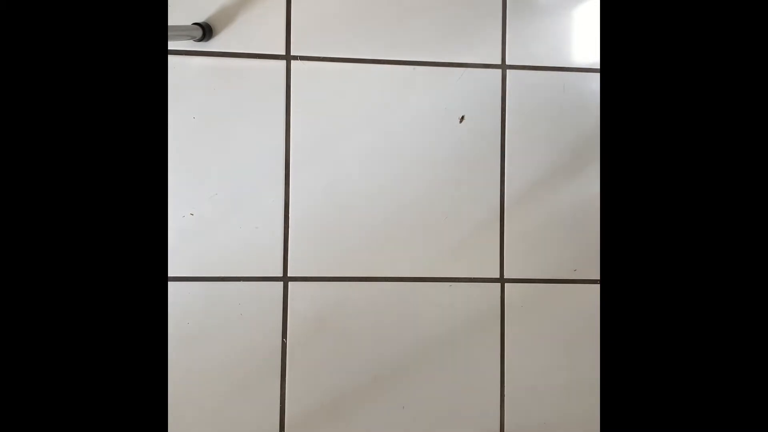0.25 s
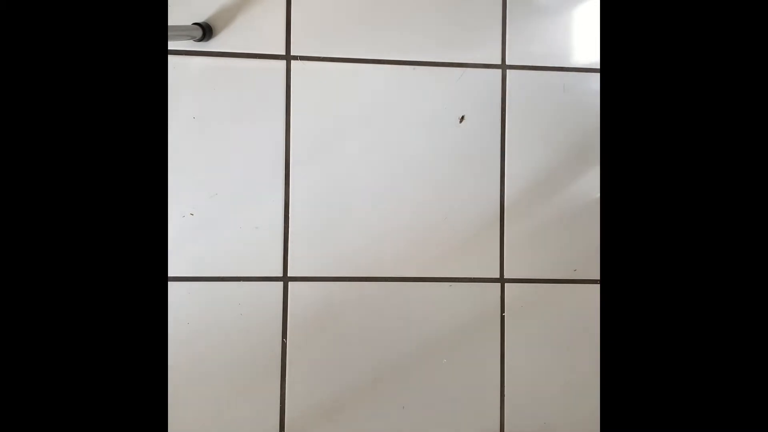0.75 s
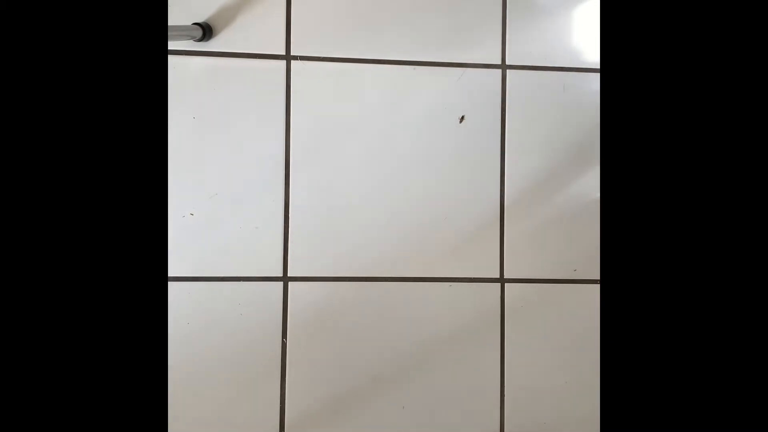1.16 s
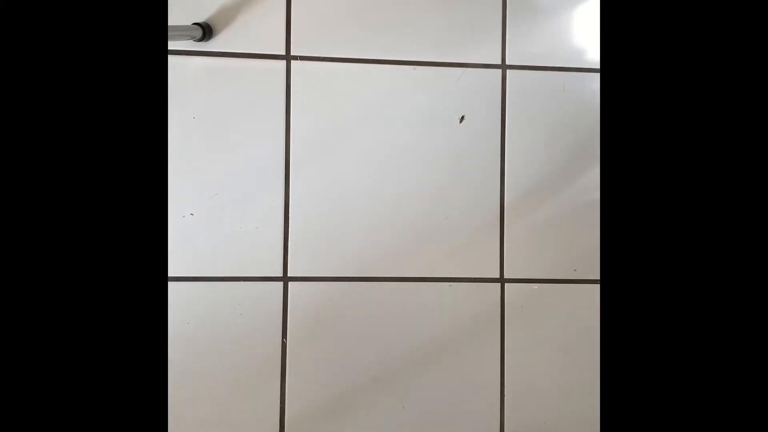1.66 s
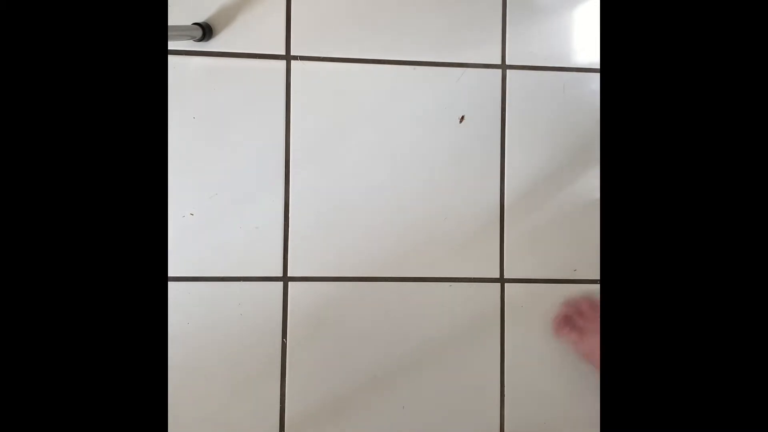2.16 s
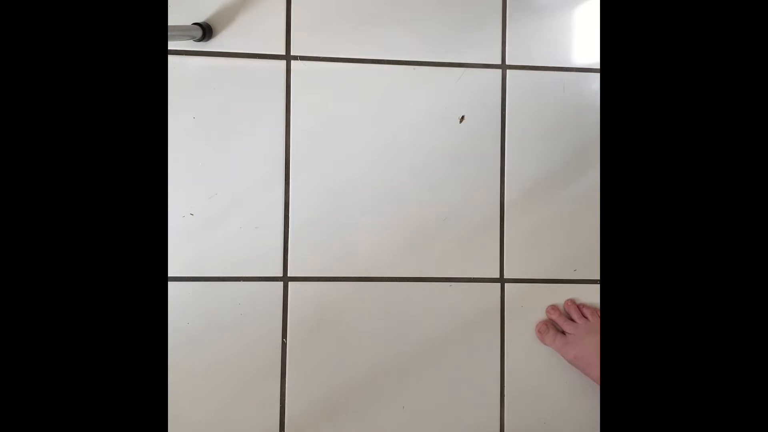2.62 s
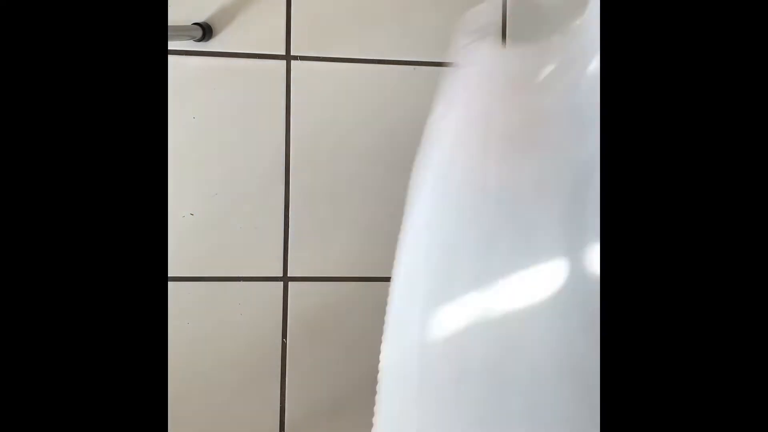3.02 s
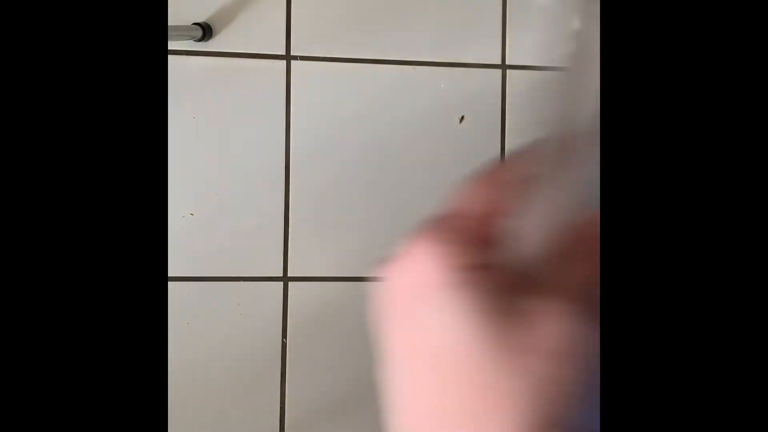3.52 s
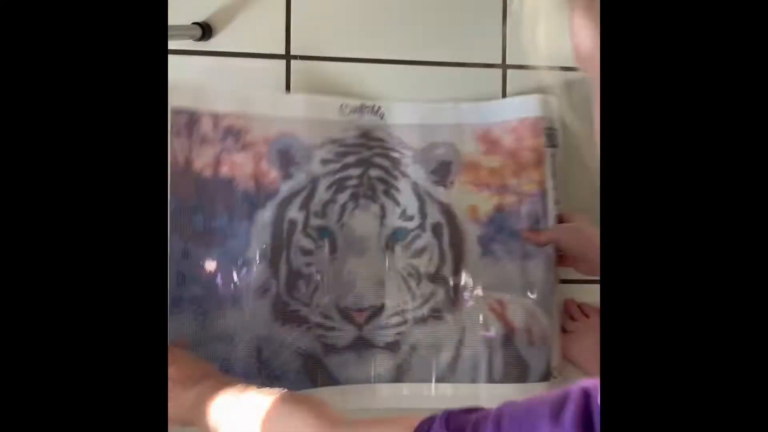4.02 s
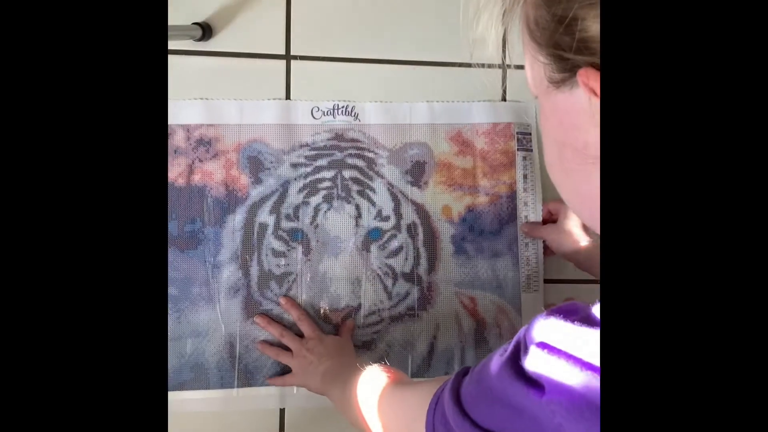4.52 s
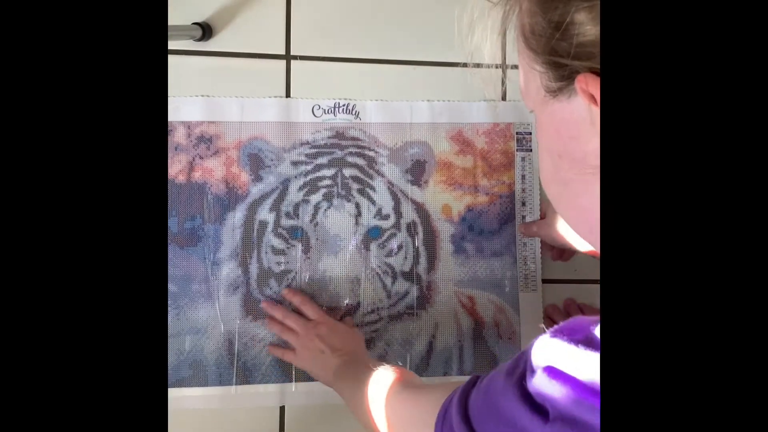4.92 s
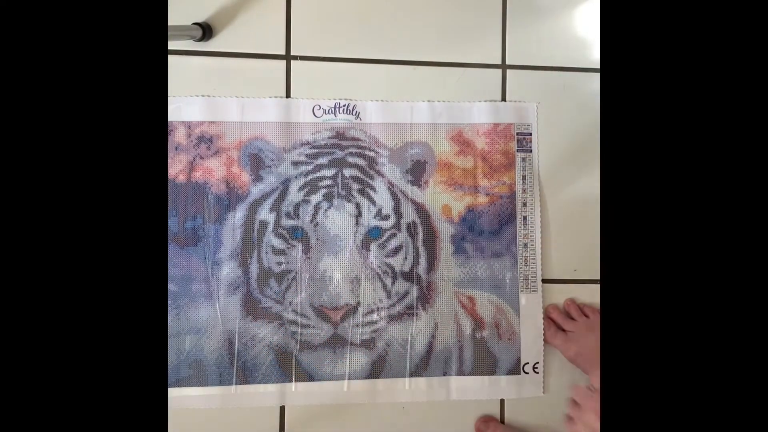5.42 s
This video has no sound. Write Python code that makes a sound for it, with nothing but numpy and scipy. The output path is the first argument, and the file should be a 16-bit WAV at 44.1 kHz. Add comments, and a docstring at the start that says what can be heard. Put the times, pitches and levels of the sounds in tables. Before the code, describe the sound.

In a small tiled room, a rolled canvas under plastic film is handled close to a stereo microphone. Crisp crinkles come in short bursts, with a hard snapping cluster near 1.5 seconds, hollow rubbing and soft footfalls. It crackles loudest just before 3 seconds, quietens, then slaps down with a sharp crack at about 4.1 seconds. A few small smoothing rustles follow and fade to near silence.

```python
"""A stiff canvas under plastic film is unrolled, carried barefoot over tiles, laid down and smoothed by hand.
From the start, noise rumbles, filtered deep noise stirs, a dense swarm of tiny buckles rings the film
and rubbing booms in the roll; creases crack and ring, with short echoes from tiles and walls.
Then soft hollow bumps swell and die, gliding resonances creak, and heels thud as sagging sines.
By 3 s the open sheet flaps dully in place of the roll; two close microphone ports hear it all."""
import sys
import numpy as np
from scipy import signal
from scipy.fft import rfft, irfft, next_fast_len
from scipy.io import wavfile

SR = 44100
rng = np.random.default_rng(int(sys.argv[2]) if len(sys.argv) > 2 else 0)


def generate_wav(sig):
    """Save sig (samples, or channels by samples) to the path in sys.argv[1] as 16-bit PCM at SR."""
    pcm = np.round(np.clip(np.atleast_2d(sig).T, -1, 1) * 32767).astype(np.int16)
    wavfile.write(sys.argv[1], SR, pcm)


N = 250045

# spectrum of room noise and hiss: f/Hz, relative level per Hz/dB
RUMBLE_SPECTRUM = [(15, -45.5), (25, -11.5), (43, 0.5), (92, -3), (120, -13.5), (157, -19.5), (190, -20),
                   (217, -11.5), (818, -33), (988, -20.5), (1740, -41.5), (13200, -34.5), (16000, -44)]
RUMBLE_DB = -69.5   # rms, before the bass wanders

# deep stir of feet and cloth in floor and air: t/s, mean level/dB
STIR_LEVELS = [(0.0, -56), (0.17, -83.5), (0.39, -91), (0.578, -68.5), (1.47, -74.5), (1.71, -77),
               (2.1, -61), (2.32, -68.5), (2.54, -81), (2.7, -63), (3.03, -66), (3.46, -74), (3.84, -66.5),
               (3.99, -62), (4.2, -77.5), (4.75, -73.5), (5.5, -78.5), (5.67, -66.5)]

# grips, pulls and strokes that crumple the film: t at full strength/s, hold/s, crinkle level/dB,
# swell/s per 20 dB, fade/s per 20 dB (either acts as at least .01 s), then trims over the crinkle:
# crispness/dB, sheet body/dB, hollow of the sheet/dB, sizzle/dB
CRUMPLES_BY_HAND = [(0.0, 0.017, -51.5, .05, 0.083, 1, 3, 2, -9),
                    (0.218, .01, -63, 0.06, 0.15, 1, 9.5, 1.5, -1.5),
                    (0.231, 0.0055, -56, 0.02, 0.1545, -4, 2.5, -3, -9.5),
                    (0.367, 0.25, -71, -0.6, 0.5, 7.5, -1, -2, 0.5),
                    (0.519, 0.023, -62, -0.2, -0.04, 11.5, 1, -4, -7),
                    (0.546, 0.041, -53.5, -0.05, 0.06, 9, 0, -12.5, -6),
                    (0.589, 0.016, -47, -0.0846, 0.0573, -0.5, -6, -16, -12),
                    (0.67, 0.012, -58.5, 0.01, -0.05, 7.5, -1, -11.5, -10),
                    (0.695, 0.014, -49.5, 0.01, -0.02, 3, -5, -20, -8),
                    (0.718, 0.05, -45.5, 0.02, 0.0323, 5, -5.5, -12.5, -13),
                    (0.785, 0.01, -42, 0.0148, 0.0486, 1.5, -4.5, -5.5, -9),
                    (0.854, 0.029, -58, 0.12, 0.055, 0.5, -1.5, -7, -12),
                    (1.219, .036, -72, -0.05, 1.5, -12, -15, -4, -4),
                    (1.286, .035, -67, 0.14, 0.3, 1, 8, 0.5, -6),
                    (1.336, 0.14, -44.5, 0.02, 0.09, -6.5, -0.5, -8.5, -1),
                    (1.395, 0.032, -43.5, -0.0245, 0.0342, -2, -9.5, -12.5, 4.5),
                    (1.452, 0.027, -41.5, -0.003, 0.04, 3, -8, -16, 4.5),
                    (1.485, 0.019, -40.5, 0.0149, 0.07, -6.5, -2, -10.5, -8.5),
                    (1.688, 0.055, -53.5, 0.0756, 0.07, -18, 0, -19, -8),
                    (1.771, 0.085, -52, 0.135, 0.08, -8, -2, -11, -6),
                    (1.948, 0.11, -54, 0.4, 0.18, -11, 2.5, -1.5, -14.5),
                    (2.119, 0.015, -43.5, 0.135, 0.0437, -13, -2.5, -14, -15),
                    (2.161, 0.015, -57, 0.3, 0.09, -9.5, 1.5, 5, -8),
                    (2.236, 0.0091, -59.5, 0.36, 0.29, -8, 1, -4.5, -13.5),
                    (2.366, .03, -66.5, 1.34, 0.5, -35, 4, 2.5, -21),
                    (2.436, 0.017, -57, -0.3, 0.37, -17, -5, -7.5, -16),
                    (2.51, 0.035, -56, 0.01, 0.25, -4.5, -9, 3.5, -21),
                    (2.659, 0.026, -51, 0.02, 0.22, -7.5, -1.5, -1.5, -16),
                    (2.774, 0.039, -54, 0.04, 0.1033, -1.5, 7, -4.5, -10),
                    (2.844, 0.024, -51.5, 0.04, .04, -3.5, 2.5, -8, -12),
                    (2.87, 0.046, -35.5, 0.0067, 0.0522, -3.5, -1, -13.5, -12),
                    (2.924, 0.023, -33.5, 0.0143, 0.0338, 1.5, -1.5, -21.5, -7.5),
                    (2.98, 0.01, -56, -0.07, 0.13, -3, -5.5, -0.5, -13),
                    (3.085, 0.012, -65.5, 2.3, 0.13, -6, 2.5, 3.5, -7),
                    (3.448, 0.026, -73, 0.11, 1.26, 4, -4, 6.5, -2),
                    (3.536, 0.013, -65, 0.08, -0.26, -8, 5, 3, -11),
                    (3.585, 0.0067, -67.5, 0.23, 0.17, -2, 0, -4, -5),
                    (3.666, 0.11, -68.5, 0.06, 1.08, -17, 1, 8, -10),
                    (3.816, 0.072, -55, 0.0735, 0.13, -2.5, 1, -3.5, -9),
                    (3.911, 0.015, -55, 0.0642, 0.0964, 0, -5, -2.5, -6.5),
                    (4.031, .01, -52, -0.016, 0.0433, 0, -8, -6.5, -12),
                    (4.054, 0.025, -45.5, 0.0335, 0.0982, -4, 1, -6, -13.5),
                    (4.075, 0.016, -37.5, 0, 0.097, -6, -4.5, -12.5, -14),
                    (4.172, 0.016, -55, 0.03, 0.14, -13.5, -6.5, -19, -16),
                    (4.314, 0.011, -65.5, 0.3, 0.15, -21, -4, -4, -15.5),
                    (4.387, 0.063, -56.5, 0.13, 0.094, -9, -10, -27, -14.5),
                    (4.467, 0.018, -48.5, 0.0441, 0.1032, -10.5, -6, -12.5, -15),
                    (4.6, .02, -68.5, -0.1, 0.02, -25, 8, -10, -19),
                    (4.68, .025, -66.5, 0.2, 0.12, -17, -8.5, -7.5, -13),
                    (4.727, .015, -68.5, -0.1, 0.1, -17, -20, -1.5, -21),
                    (4.827, .03, -75, 1, 0.38, -11, -12, 5, -13.5),
                    (4.887, 0.043, -65, 0, 0.11, -10.5, -23.5, -11.5, -12.5),
                    (5.606, .07, -80.5, 0.1, -1.6, -5, 3, 14.5, -5.5)]
# the sheet at rest: crinkle level/dB, then trims: crispness/dB, sheet body/dB, hollow/dB, sizzle/dB
SHEET_AT_REST = (-93, -5.5, 11.5, 13.5, -1)
ROUNDING = 1.21   # swells and fades steepen away from the hold: power of the time

# tone colour of the film: f/Hz, relative level per Hz/dB
FILM_SPECTRUM = [(450, -13), (900, -7), (1600, -4), (3000, -1.5), (5000, -1), (7000, -2.5), (10000, -4.5),
                 (15500, -5.5)]
BUCKLES_PER_S = 6000   # on average

# air in the rolled sheet: f/Hz, width/Hz, relative level/dB
ROLL_RESONANCES = [(360.3, 45, -2.5), (286, 180, -2), (663, 64.8, -9.5)]
# the open sheet, one resonance: f/Hz, width of one filter pass/Hz, level over the hollow/dB
OPEN_SHEET_FLAP = (238, 460, -1.5)
UNROLLED_S = 2.96

# single creases snapping: t/s, tone level/dB, f/Hz, left over right/dB, broad crack over tone/dB
CREASE_SNAPS = [(0.03, -35, 9100, -12, -14), (1.334, -52.5, 8450, -2.5, -3), (1.378, -37, 690, -3, -13.5),
                (1.458, -21, 9000, -5.5, -10), (1.4638, -23, 8550, -6.5, -9), (1.4705, -23, 8500, -6.5, -9),
                (1.4878, -15.5, 8650, -8.5, -5), (1.4884, -14.5, 11900, 4, -4.5),
                (1.4892, -18, 3920, 0, -6), (1.4886, -26, 1550, 1, -16), (1.4925, -22, 2050, -0.5, -11),
                (2.247, -44, 3300, -3, -19), (2.276, -40, 890, 2, -29), (2.522, -50, 7540, 5, 7),
                (2.540, -53, 9000, 7, 0), (2.558, -59, 8000, 0, 0), (2.866, -28.5, 4230, 1.5, -10.5),
                (2.874, -28.5, 3880, 1.5, -15.5), (2.922, -29.5, 620, 1, -14), (2.931, -25, 8000, -4.5, -1),
                (2.9375, -26, 910, -1, -2), (2.949, -22, 1100, 2.5, -15.5), (3.089, -47, 13250, 3, -9.5),
                (3.205, -65, 1440, -3, -13), (3.258, -61, 1290, 6.5, -12.5), (3.423, -52, 700, 1, -2),
                (3.4244, -55, 1500, 2, -8), (3.433, -50.5, 1210, 4, 1), (3.447, -54, 1150, 0, -7),
                (3.487, -56, 804, 0, -10), (3.514, -45.5, 13900, 5, -12), (3.591, -52, 3840, 5, 9),
                (3.5915, -54, 1300, -0.5, -6), (3.597, -52, 6500, 2, 3), (3.668, -58, 1750, 2, -15),
                (3.708, -46.5, 8240, -1, -4), (3.848, -37, 13100, 0.5, -7),
                (3.888, -40.5, 9100, -0.5, -4.5), (4.026, -40, 1430, 6, -2),
                (4.0745, -13.5, 2010, 3, -12.5), (4.0746, -16.5, 2660, -1, -14),
                (4.0805, -19.5, 2250, 0, -15), (4.128, -35.5, 1150, 0, -12), (4.090, -16, 4240, -2.5, -3.5),
                (4.0905, -25.5, 1000, 2.5, -25.5), (4.309, -44, 2900, -5, -15), (4.315, -44, 2950, -3, -13),
                (4.431, -41, 2640, 2, -10), (4.465, -43, 3900, -1, -8), (4.469, -39, 3080, 0, -10),
                (4.676, -50, 3010, -8, -8), (4.872, -69, 2015, 8.5, -15.5), (4.881, -44.5, 3630, -3, -22),
                (4.913, -43, 13470, -2, -13), (4.921, -45, 3430, -1, -25)]
RING_T60_S, RING_CYCLES = 0.0021, 9.2   # a crease rings this long, plus so many cycles
RUSTLE_DB, RUSTLE_SHRINKS = -15, 0.22   # rustle over a -40.5 dB snap; dB lost per dB of a louder snap

ROOM_T60_S, ROOM_DB = 0.16, -15.5   # bass decay; gain of the echoes

# soft hollow bumps of the roll, later of the open sheet: t of the peak/s, peak level/dB, f/Hz, swell/s
HOLLOW_BUMPS = [(.25, -37, 372, 0.0048), (.79, -39.5, 298, 0.01), (2.283, -41.5, 380, 0.0041),
                (2.537, -35, 340, 0.0023), (3.49, -54.5, 330, 0.0024), (3.676, -53, 218, 0.0073)]

# film and skin creaking or scraping in one resonance:
# t/s, length to -6 dB/s, start f/Hz, end f/Hz, width/Hz (acts as at least 70), rms level/dB
FILM_CREAKS = [(.565, 0.044, 2004, 1798, 400, -52.5), (.58, 0.026, 3700, 3660, 500, -54),
               (0.766, 0.037, 2203, 2006, 500, -50), (.78, 0.04, 1450, 1430, 98, -52.5),
               (0.88, 0.033, 610, 600, 150, -63.5), (.895, 0.013, 1520, 1540, 40, -71),
               (0.913, 0.025, 1590, 1600, 40, -65), (1.422, 0.053, 370.5, 364, 30, -50),
               (1.659, 0.14, 720, 717, 60, -68), (1.667, 0.049, 2000, 2300, 503, -57),
               (1.751, .1, 1060, 1015, 90, -59), (1.796, 0.078, 371, 357, 30, -59),
               (1.904, 0.18, 714, 673, 60, -67), (1.998, 0.066, 1250, 1200, 100, -61),
               (2.062, .08, 1341, 1480, 100, -54.5), (2.09, 0.063, 2017, 2050, 200, -64),
               (2.426, .04, 4100, 4120, 700, -58), (2.49, 0.032, 3100, 2990, 600, -56),
               (2.488, 0.029, 1080, 1060, 80, -61), (2.643, 0.042, 2900, 2880, 900, -54),
               (2.661, 0.057, 780, 796, 80, -61.5), (2.68, 0.042, 1572, 1565, 100, -59),
               (2.784, 0.021, 2740, 2690, 900, -55.5), (2.853, 0.025, 4100, 3800, 908, -42),
               (2.892, 0.021, 3780, 3940, 700, -41), (2.927, 0.014, 890, 1000, 250, -38),
               (2.947, 0.0091, 1256, 964, 60, -35.5), (2.961, 0.0093, 964, 900, 100, -42.5),
               (3.642, 0.044, 1890, 1870, 80, -70), (3.703, 0.052, 1793, 1800, 300, -68),
               (3.819, 0.015, 1060, 1110, 50, -56.5), (3.854, 0.015, 2600, 2550, 150, -60),
               (3.908, .018, 1810, 1780, 120, -61.5), (3.931, 0.024, 1660, 1680, 30, -56.5),
               (3.919, 0.021, 526, 485, 80, -54.5), (4.007, .016, 1820, 1800, 60, -66.5),
               (4.042, 0.027, 950, 1040, 150, -48), (4.028, 0.021, 2620, 2530, 151, -54),
               (4.339, 0.021, 1124, 1110, 150, -65), (4.365, 0.018, 1280, 1230, 150, -65.5),
               (4.288, 0.0085, 1150, 1150, 150, -66), (4.386, 0.053, 2810, 2500, 600, -61),
               (4.401, .06, 4000, 3880, 600, -59), (4.434, 0.01, 1210, 1230, 60, -68),
               (4.45, 0.012, 800, 785, 30, -53.5), (4.463, 0.029, 735, 720, 50, -50.5),
               (4.498, 0.053, 715, 712, 60, -62.5), (4.469, 0.0282, 970, 940, 50, -57.5),
               (4.665, .03, 3800, 3760, 500, -68), (4.702, 0.051, 3220, 3090, 597, -75),
               (4.887, 0.063, 2910, 2785, 500, -71)]
CLEAN_BELOW_HZ, CLEANEST = 70, .55   # narrower creaks hold more tone, never over this share of power

# heels, knees and flaps of air: t/s, level before the soft onset/dB, f/Hz, t60/s
FLOOR_THUDS = [(0.727, -47, 90, .1), (0.764, -39, 80, 0.087), (0.789, -32, 197, 0.051),
               (0.81, -50, 75, 0.085), (1.371, -44, 70, 0.11), (1.491, -45.5, 205, 0.14),
               (1.928, -36.5, 75, 0.056), (1.981, -48, 170, .04), (2.117, -42.5, 129, 0.07),
               (2.15, -45.5, 64.7, 0.085), (2.524, -31, 78, 0.054), (2.549, -29.5, 52.4, 0.11),
               (2.755, -44, 109, 0.069), (2.931, -46, 60, 0.13), (3.067, -37.5, 75, 0.099),
               (3.145, -47, 90.5, 0.11), (3.428, -44.5, 75, 0.14), (3.511, -46, 82, 0.1),
               (3.672, -47, 140, 0.064), (3.744, -47.5, 69.4, 0.13), (4.076, -39, 135, 0.16),
               (4.09, -40, 70, 0.11), (4.11, -39.5, 49.7, 0.1), (5.165, -54.5, 78.1, 0.12)]
THUD_LAG_S = 0.0008   # lag between the ports

# share of the left port heard on the right: f/Hz, share
BASS_SHARES = [(40, 0.87), (150, .76), (350, 0.75), (700, 0.041), (1100, .1), (2000, 0)]
# the same, with the right port early: f/Hz, share
TREBLE_SHARES = [(4000, 0.047), (6000, 0.084), (8500, 0.59), (10300, 0.67), (12000, 1), (16000, 1)]
PORT_LEAD_S, IN_PHASE_HZ = .00031, 13450
PORT_PEAK_HZ, PORT_PEAK_WIDTH_HZ, PORT_PEAK_DB = 9800, 300, 2   # cavity of the right port
CUTOFF_HZ = 15850


def from_db(db):
    """Decibels to gain."""
    return 10 ** (np.asarray(db) / 20)


def rms_one(x):
    """Scale to unit rms."""
    return x / np.sqrt(np.mean(x ** 2) + 1e-20)


def at_hz(points, hz):
    """Read a spectrum on a log-frequency axis."""
    points = np.array(points)
    return np.interp(np.log(hz), np.log(points[:, 0]), points[:, 1])


def drift(rate_hz):
    """Slow random wander with spread 1: twice-smoothed noise, drawn every 40 samples."""
    pole = np.exp(-80 * np.pi * rate_hz / SR)
    noise = rng.standard_normal(N // 40 + 2002)
    slow = signal.lfilter([1], [1, -2 * pole, pole * pole], noise)[2000:]   # settled part
    return np.interp(np.arange(N) / 40, np.arange(len(slow)), rms_one(slow))


def ring(clicks, hz, t60):
    """A band-pass resonance: a click rings and dies by 60 dB in t60."""
    pole = from_db(-60 / (t60 * SR))
    angle = 2 * np.pi * hz / SR
    return signal.lfilter([1, 0, -1], [1, -2 * pole * np.cos(angle), pole * pole], clicks + 1e-18)


def ring_twice(clicks, hz, t60):
    """Two equal resonances in a row, for a rounder onset and steeper skirts."""
    return ring(ring(clicks, hz, t60), hz, t60)


def panned(pan_db):
    """Left and right gains, as a column."""
    return from_db(np.array([[pan_db / 2], [-pan_db / 2]]))


def rumble():
    """Room noise and microphone hiss with a steady top; the bass level wanders."""
    hz = np.maximum(np.fft.rfftfreq(N, 1 / SR), 5)
    spectrum = rfft(rng.standard_normal((2, N))) * from_db(at_hz(RUMBLE_SPECTRUM, hz))
    noise = rms_one(irfft(spectrum, N))
    bass = signal.sosfilt(signal.butter(2, 300, fs=SR, output="sos"), noise)
    return from_db(RUMBLE_DB) * (noise - bass + bass * from_db(2.0 * drift(5.1)))


def stir():
    """Feet and cloth stir floor and air: deep band-passed noise with a lumpy level."""
    band = signal.butter(2, [38, 150], "band", fs=SR, output="sos")
    deep = signal.sosfilt(band, rng.standard_normal((2, N)))
    level_db = np.interp(np.arange(N) / SR, *np.transpose(STIR_LEVELS))
    return from_db(level_db + 2.5 * drift(8)) * rms_one(deep)


def crumpling():
    """Crumples swell, hold and fade; their powers add, and each lends its colour as far as it is heard."""
    t = np.arange(0, N + 64, 64) / SR
    s, hold, peak_db, swell, fade, *colours = np.transpose(CRUMPLES_BY_HAND)[:, :, None]
    before, after = np.maximum(s - t, 0), np.maximum(t - s - hold, 0)
    distance = before / np.maximum(swell, .01) + after / np.maximum(fade, .01)
    power = from_db(peak_db - 20 * distance ** ROUNDING) ** 2
    rest = from_db(SHEET_AT_REST[0]) ** 2
    total = power.sum(axis=0) + rest
    curves = [10 * np.log10(total)]
    for colour, idle in zip(colours, SHEET_AT_REST[1:]):
        curves.append(((power * colour).sum(axis=0) + rest * idle) / total)
    return [np.interp(np.arange(N) / SR, t, curve) for curve in curves]


def crinkle(level_db, crisp_db, body_db, sizzle_db, spread_db, clump_db, patchy_db, cycles):
    """Buckles fall at random, in a dense and even swarm; each rings patches of film, others on each side."""
    sizes_db = spread_db * np.minimum(rng.exponential(1, N), 3.5) + clump_db * drift(31)
    sizes = from_db(sizes_db) * rng.choice([-1, 1], N)
    buckles = sizes * (rng.random(N) < BUCKLES_PER_S / SR)

    def patch(hz, turns):
        """One patch of film, its loudness wandering."""
        struck = buckles * (rng.random((2, N)) < .3)      # a buckle reaches only some patches
        wander_db = patchy_db * (0.76 * drift(8.0) + 0.68 * drift(30.0))
        return from_db(wander_db) * rms_one(ring_twice(struck, hz, turns / hz))

    sizzle = patch(8300, 24.0) + 0.39 * patch(9200, 41.0)
    out = from_db(level_db + sizzle_db) * sizzle * panned(-9.0)   # leans right
    for hz in np.geomspace(520, 15500, 28):
        dull = np.interp(np.log(hz), np.log([1200, 2700]), [1, 0])
        bright = np.interp(np.log(hz), np.log([3500, 11000]), [0, 1])
        colour_db = at_hz(FILM_SPECTRUM, hz) + 10 * np.log10(hz / 3000)   # patches widen with pitch
        gain_db = level_db - 8.5 + colour_db + dull * (body_db + 5.0) + bright * crisp_db
        out += from_db(gain_db) * patch(hz, cycles)
    return out


def hollow(level_db):
    """Rubbing stirs the air column of the roll; once open, the sheet only flaps dully."""
    rub = rng.standard_normal((2, N)) * from_db(2.1 * drift(25) + 2.6 * drift(9.0))
    tube = np.zeros((2, N))
    for hz, width_hz, db in ROLL_RESONANCES:
        tube += from_db(db) * rms_one(ring_twice(rub, hz, 1.4 / width_hz))
    hz, width_hz, flap_db = OPEN_SHEET_FLAP
    flap = from_db(flap_db) * rms_one(ring_twice(rub, hz, 2.36 / width_hz))
    rolled = np.clip((UNROLLED_S - np.arange(N) / SR) / 0.04, 0, 1)   # 40 ms crossfade
    return from_db(level_db) * (rolled * rms_one(tube) + (1 - rolled) * flap)


def snaps():
    """A broad crack, a short ring at the pitch of the crease, then the film rustles to rest."""
    out, t = np.zeros((2, N)), np.arange(8192) / SR
    for s, peak_db, hz, pan_db, crack_db in CREASE_SNAPS:
        noise = rng.standard_normal((2, len(t)))
        crack = noise * from_db(crack_db - 60 * t / 0.0026)
        rustle_db = RUSTLE_DB - RUSTLE_SHRINKS * (peak_db + 40.5)
        film = .5 * noise + rms_one(ring(noise, hz, 4.1 / hz))
        rustle = film * from_db(rustle_db - 60 * t / 0.078)
        t60 = RING_T60_S + RING_CYCLES / hz
        onset = np.minimum(hz * t, 1)   # one cycle
        tone = np.sin(2 * np.pi * hz * t) * onset * from_db(-60 * t / t60)
        start = round(s * SR)
        out[:, start:start + len(t)] += from_db(peak_db) * panned(pan_db) * (crack + rustle + tone)
    return signal.sosfilt(signal.butter(2, 500, "high", fs=SR, output="sos"), out)


def room(x):
    """Eight feedback delays a side off tiles and walls, dying faster in the treble."""
    size = next_fast_len(N + SR)
    hz = np.fft.rfftfreq(size, 1 / SR)
    t60 = ROOM_T60_S / (1 + hz / 9000)
    response = np.zeros((2, len(hz)), complex)
    for k, lag in enumerate(rng.uniform(.004, .022, 16)):
        loop = from_db(-60 * lag / t60) * np.exp(-2j * np.pi * hz * lag)
        response[k % 2] += loop / (1 - loop) * (-1) ** (k // 2)   # alternate sides and signs
    return irfft(response * rfft(x, size), size)[:, :N]


def bumps():
    """Soft hollow bumps of the roll, later of the open sheet: each tone swells and dies at its own pitch."""
    t, out = np.arange(N) / SR, np.zeros(N)
    for s, db, hz, swell in HOLLOW_BUMPS:
        out += from_db(db) * np.cos(2 * np.pi * hz * (t - s)) * np.exp(-abs(t - s) / swell)
    return out


def creaks():
    """A gliding resonance, squeaky when narrow, scraping when wide; it starts fast, holds and fades."""
    out = np.zeros((2, N))
    for s, length, hz, end_hz, width_hz, level_db in FILM_CREAKS:
        t = np.arange(round(2 * length * SR)) / SR
        slips = rng.standard_normal((2, SR // 2)) + 1j * rng.standard_normal((2, SR // 2))
        lowpass = signal.butter(2, max(width_hz, 70) / SR)   # half the width lies either side of the pitch
        slips = signal.lfilter(*lowpass, slips)[:, -len(t):]
        slips = slips / np.sqrt(np.mean(abs(slips) ** 2))
        clean = CLEANEST * np.exp(-(width_hz / CLEAN_BELOW_HZ) ** 2)
        swing = np.sqrt(clean) + np.sqrt(1 - clean) * slips
        glide = np.cumsum(hz + (end_hz - hz) * np.minimum(t / length, 1)) / SR
        voiced = np.sqrt(2) * np.real(swing * np.exp(2j * np.pi * glide))
        envelope = np.minimum(t / .004, 1) * from_db(level_db - 6 * (t / length) ** 4)
        start = round(s * SR)
        out[:, start:start + len(t)] += voiced * envelope
    return out


def thuds():
    """A soft push whose pitch sags as it rings out; each reaches one port slightly sooner, drawn at random."""
    out, t = np.zeros((2, N)), np.arange(8192) / SR
    sides = rng.choice([-1, 1], len(FLOOR_THUDS))
    for (s, peak_db, hz, t60), side in zip(FLOOR_THUDS, sides):
        cycles = hz * (t + 0.004 * (1 - np.exp(-t / 0.0045)))
        onset = 1 - np.exp(-t / 0.0049)
        push = np.sin(2 * np.pi * cycles) * onset * from_db(peak_db - 60 * t / t60)
        for port, lag_s in zip(out, (side * THUD_LAG_S / 2, -side * THUD_LAG_S / 2)):
            start = round((s + lag_s) * SR)
            port[start:start + len(t)] += push
    return out


def shared(pair, shares, lead_s=0):
    """Part of what the left port hears replaces the right port's own sound."""
    size = next_fast_len(N + 4096)
    hz = np.maximum(np.fft.rfftfreq(size, 1 / SR), 5)
    left, right = rfft(pair, size)
    share = np.clip(at_hz(shares, hz), 0, 1)
    lead = np.exp(2j * np.pi * (hz - IN_PHASE_HZ) * lead_s)
    mixed = share * lead * left + np.sqrt(1 - share ** 2) * right
    return irfft(np.array([left, mixed]), size)[:, :N]


def scene():
    """Film, roll and steps, with echoes of the film, and the room noise."""
    level_db, crisp_db, body_db, hollow_db, sizzle_db = crumpling()
    film = crinkle(level_db, crisp_db, body_db, sizzle_db,
                   spread_db=1.5, clump_db=0.04, patchy_db=2.5, cycles=14.7)
    sheet = film + snaps() + creaks()
    echoes = from_db(ROOM_DB) * room(sheet)
    spread = rumble() + stir() + sheet + hollow(level_db + hollow_db) + echoes
    return shared(spread, BASS_SHARES) + bumps() + thuds()


def record(dry):
    """The ports share the treble, the right one a little early and with a cavity peak; both ends are cut."""
    left, right = shared(dry, TREBLE_SHARES, PORT_LEAD_S)
    cavity = signal.iirpeak(PORT_PEAK_HZ, PORT_PEAK_HZ / PORT_PEAK_WIDTH_HZ, SR)
    right = right + (from_db(PORT_PEAK_DB) - 1) * signal.lfilter(*cavity, right)
    pair = signal.sosfilt(signal.butter(3, 39, "high", fs=SR, output="sos"), [left, right])
    return signal.sosfilt(signal.ellip(10, .5, 70, CUTOFF_HZ, fs=SR, output="sos"), pair)


dry = scene()
out = record(dry)
generate_wav(out)
```